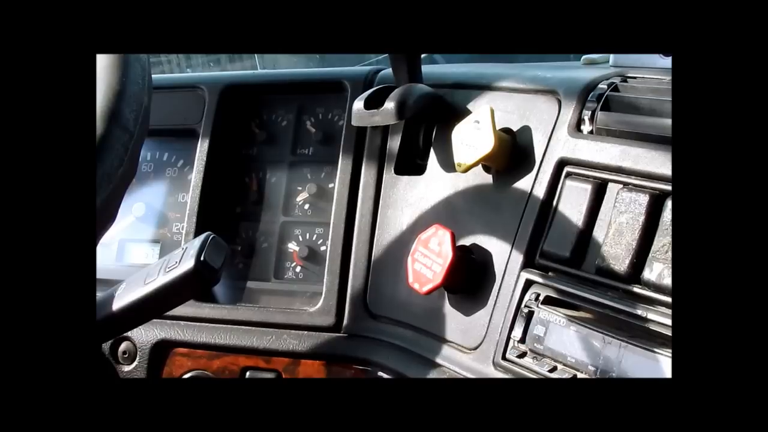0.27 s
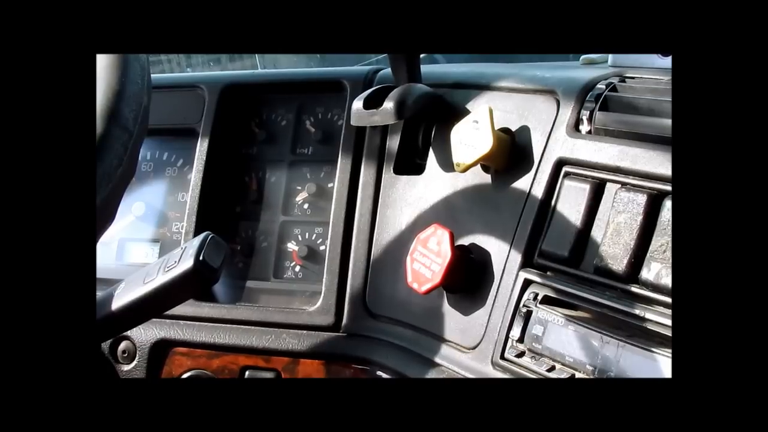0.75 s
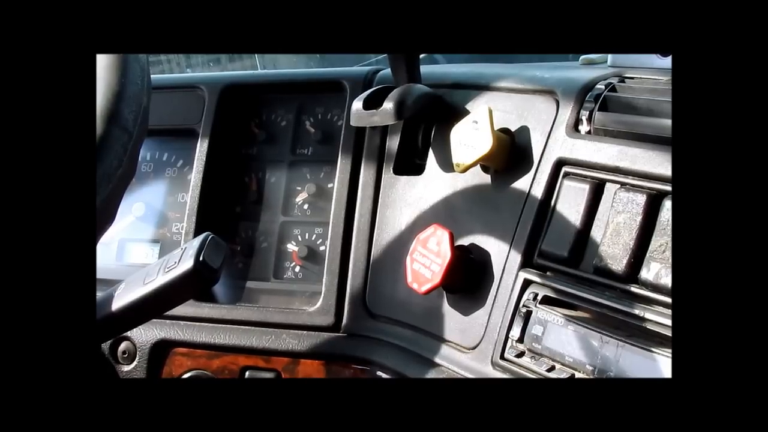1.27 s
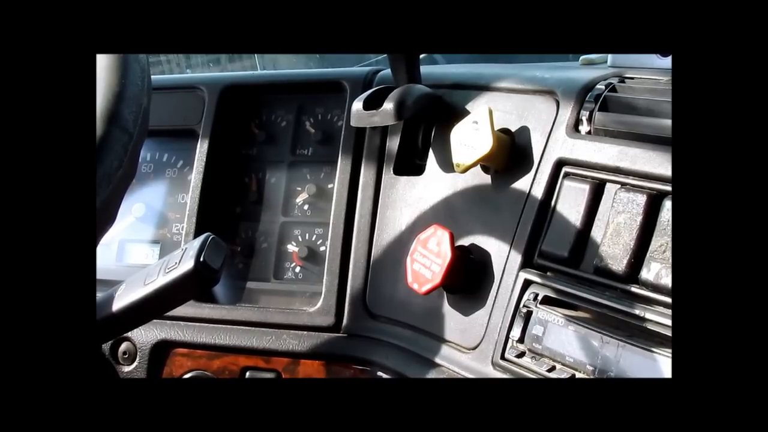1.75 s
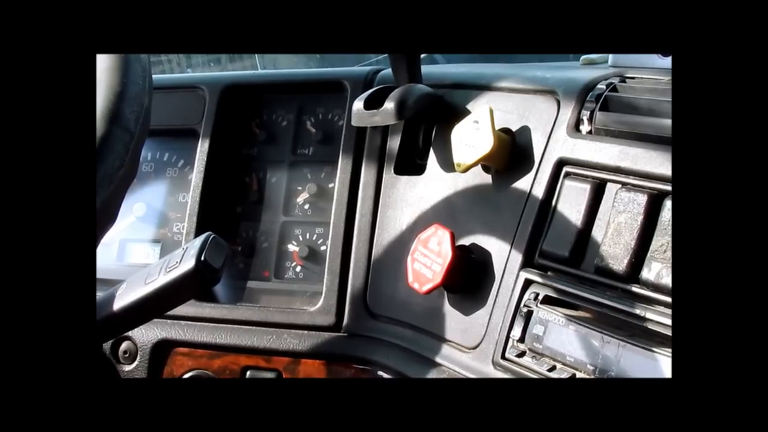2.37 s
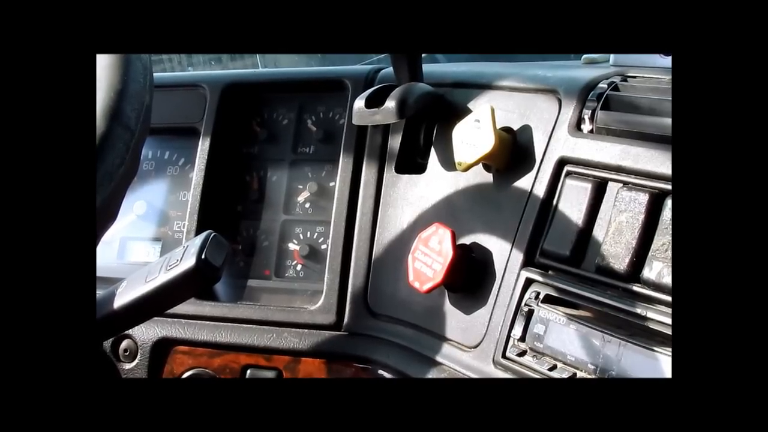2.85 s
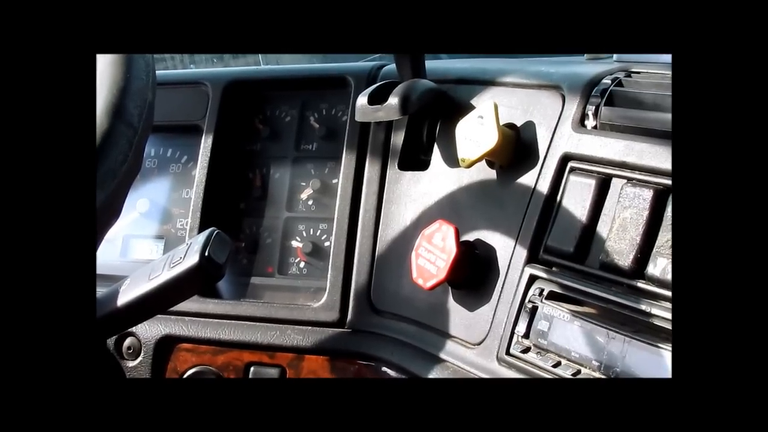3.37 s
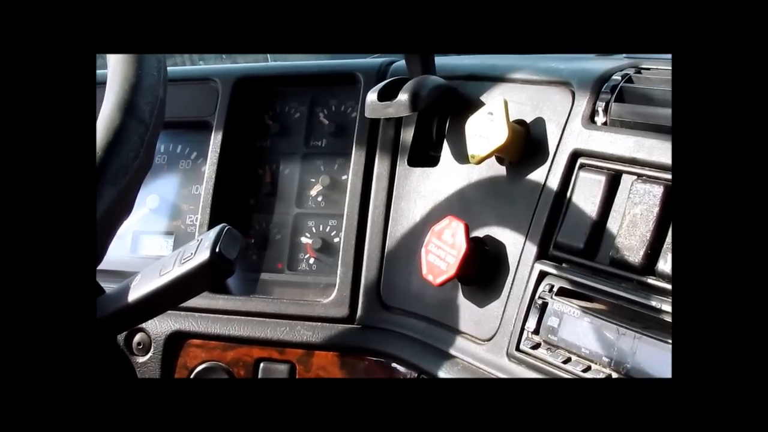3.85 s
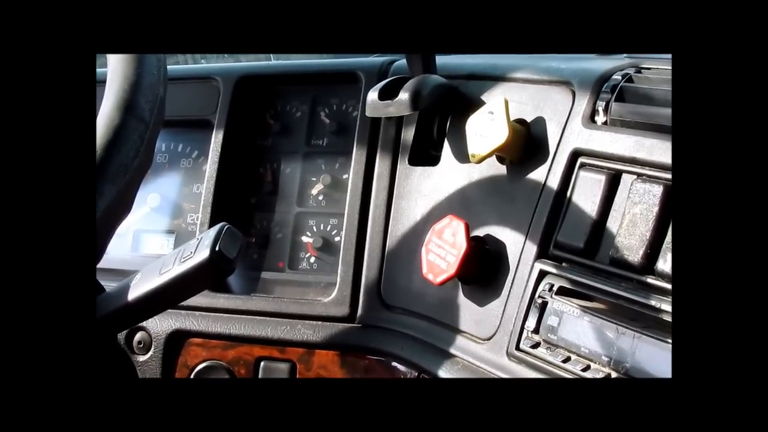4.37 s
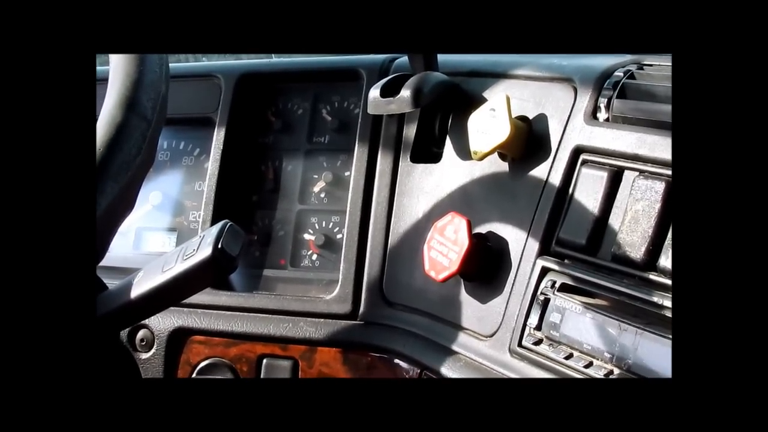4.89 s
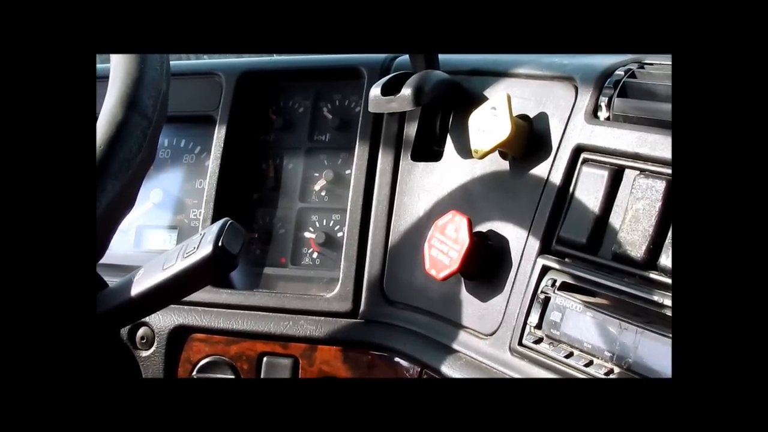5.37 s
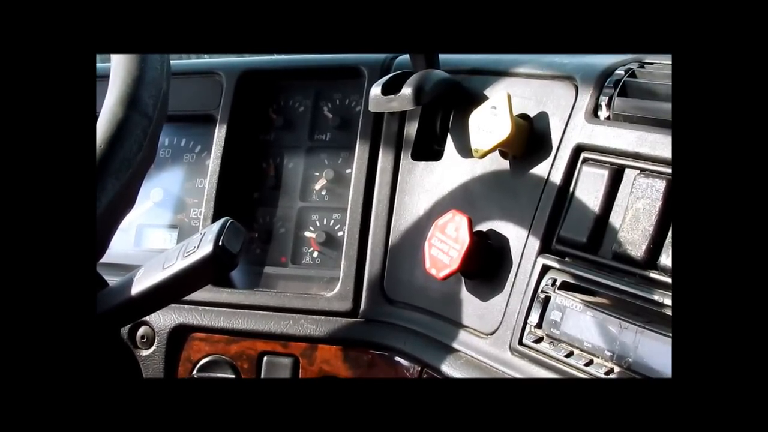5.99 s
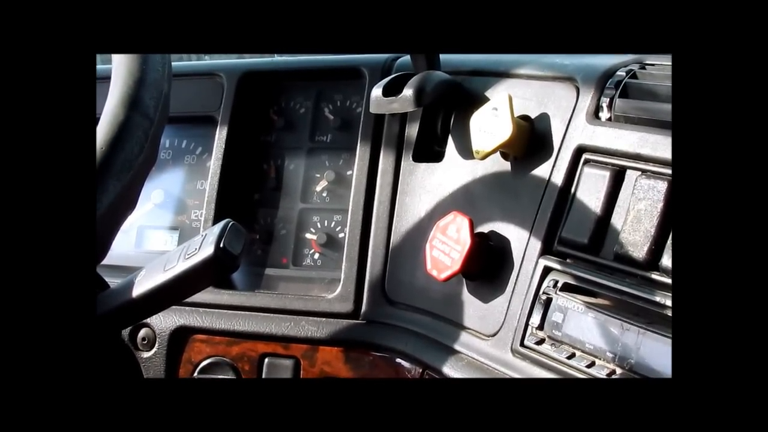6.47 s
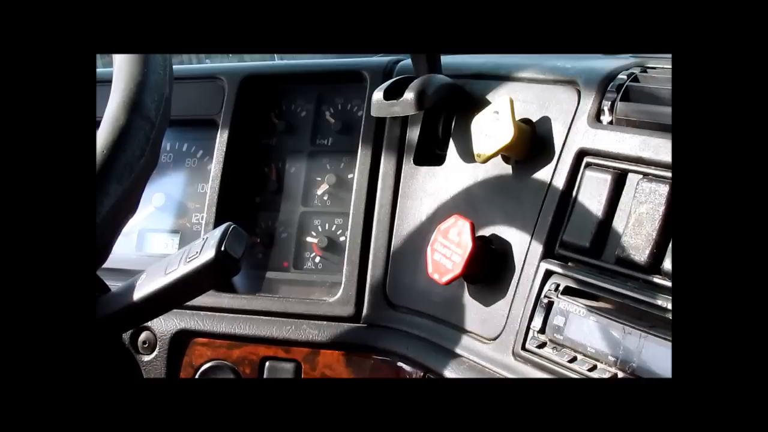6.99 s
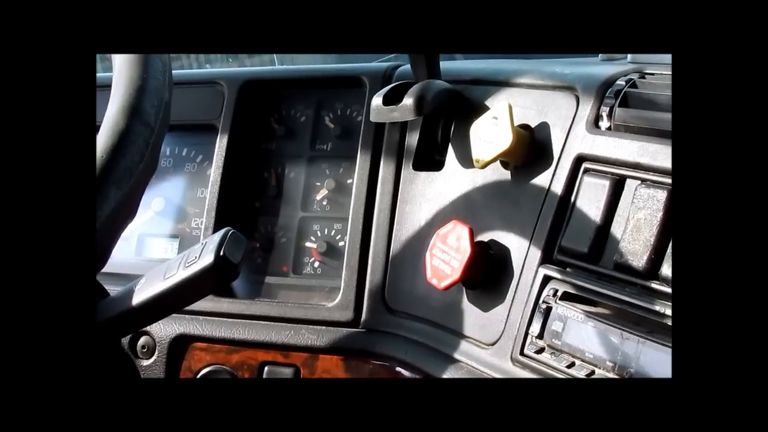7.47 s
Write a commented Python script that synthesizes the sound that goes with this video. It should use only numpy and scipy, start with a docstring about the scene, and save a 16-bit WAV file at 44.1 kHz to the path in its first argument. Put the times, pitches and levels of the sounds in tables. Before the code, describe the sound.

A bright, rushing air leak fills a parked truck's cab, faintly whistling and gradually fading over distant engine drone, with one soft bump partway through.

```python
"""Compressed air vents from an open brake line of a parked truck, heard from the driver's seat on a handheld camera.
From the start, shaped noise makes the jet rush through the cab's resonances, and gliding sines make it whistle.
As the tank empties the jet weakens and the whistle sinks in pitch; standing waves move it from side to side.
Behind it, wavering low sines make far engines drone and swell over a noise rumble.
Near 4.85 s something bumps softly: four close contacts, made of short dying sines, and a puff of rustling noise."""
import sys
import numpy as np
from scipy import signal
from scipy.fft import rfft, irfft, next_fast_len
from scipy.io import wavfile
from scipy.ndimage import uniform_filter1d, map_coordinates

SR = 44100
rng = np.random.default_rng(int(sys.argv[2]) if len(sys.argv) > 2 else 0)


def wav_record(signal):
    """Record a signal, one row per channel, as 16-bit PCM in the file named by sys.argv[1]."""
    frames = np.transpose(np.atleast_2d(signal))
    bounded = np.clip(frames, -1, 1)
    # unit amplitude maps onto the largest positive 16-bit level
    quanta = np.round(bounded * 32767).astype(np.int16)
    wavfile.write(sys.argv[1], SR, quanta)


N = 341334  # length in samples, about 7.74 s


def amp(db):
    """Turn decibels into a gain."""
    return 10 ** (np.asarray(db) / 20)


def unit(x):
    """Scale a sound to an average strength (rms) of 1."""
    return x / np.sqrt(np.mean(x ** 2) + 1e-20)


def along(points, hz, column=1):
    """Read a column of (frequency, value, ..) points at any frequency, on a log axis."""
    rows = np.transpose(points)
    return np.interp(np.log(hz + 1), np.log(rows[0] + 1), rows[column])


def curves(rows):
    """Join the points of each column after the time into a curve with one value per sample."""
    times, *columns = np.transpose(rows)
    t = np.arange(N) / SR
    return np.array([np.interp(t, times, column) for column in columns])


def wobble(rate):
    """Draw a smooth random curve through `rate` random points a second."""
    knots = rng.standard_normal(int(N * rate / SR) + 4)
    return map_coordinates(knots, [np.arange(N) * rate / SR])


def filtered(x, response):
    """Change the strength and timing of each frequency in x by a response (a function of Hz)."""
    size = next_fast_len(N + SR // 2)  # spare room so the end does not wrap onto the start
    spectrum = rfft(x, size) * response(np.fft.rfftfreq(size, 1 / SR))
    return irfft(spectrum, size)[..., :N]


def rush(patchy_db):
    """Stereo white noise with patches of random gain, as alike and as staggered as the two ports hear it."""
    # likeness of the two ports: f/Hz, left-right likeness (-1 to 1), scatter of the left lead/rad
    likeness = [(60, 0.91, 0.29), (300, 0.91, 0), (900, 0.95, 0.49), (1200, 0.83, 0.57), (1590, 0.59, 0.8),
                (2500, 0.64, 0.98), (4000, 0.48, 0.49), (6000, 0.7, 0.74), (7360, 0.97, 1),
                (10000, 0.41, 0.48), (12000, .55, 0.36), (14700, 0.46, .4)]
    # how far the left port runs ahead: f/Hz, left lead/rad
    left_lead = [(60, 0.77), (1700, 0), (2200, 0.1), (2700, 2.5), (3100, 1.04), (3700, 0.2), (4300, 1),
                 (6000, 0.7), (7200, -0.5), (8000, -1.5), (9000, -2.5), (11000, -1.87), (14500, -0.8)]
    spectra = signal.stft(rng.standard_normal((2, N)), nperseg=512)[2]
    patches = rng.standard_normal(spectra.shape[1:])
    patches = uniform_filter1d(patches, size=6, axis=0)  # smooth over frequency
    patches = uniform_filter1d(patches, size=14, axis=1)  # smooth over time
    pair = signal.istft(spectra * amp(patchy_db * unit(patches)), nperseg=512)[1][:, :N]

    def shares(hz):
        """Split of shared and opposite sound that gives the wanted likeness."""
        turn = np.arccos(np.clip(along(likeness, hz), -1, 1)) / 2
        return np.array([np.cos(turn), np.sin(turn)])

    mid, side = filtered(pair, shares)
    knots = rng.standard_normal(1000)  # reflections shift the lead from one narrow band to the next

    def stagger(hz):
        """Half of the lead goes to each port, with opposite signs."""
        scatter = along(likeness, hz, 2) * map_coordinates(knots, [hz / 90])
        return np.exp(1j * np.outer([.5, -.5], along(left_lead, hz) + scatter))

    return filtered(np.array([mid + side, mid - side]), stagger)


def tinted(x, spectrum):
    """Give stereo x a colour and the ports' left-right balance, then scale it to rms 1."""
    # balance of the ports: f/Hz, left minus right level/dB
    balance = [(60, 1.5), (130, -1), (290, -0.5), (630, 2.5), (1390, -3.0), (3050, 1), (6690, -5.5),
               (14700, -1)]
    return unit(filtered(x, lambda hz: amp(along(spectrum, hz) + np.outer([.5, -.5], along(balance, hz)))))


def cab(modes, hz, between_db):
    """Gain of broad-band sound: resonance peaks add in power over an even base."""
    peaks = sum(amp(2 * db) / (1 + (2 * (hz - centre) / width) ** 2) ** 2 for centre, width, db in modes)
    return np.sqrt(peaks + amp(2 * between_db))


def ripples(depth_db, width_hz):
    """Many small reflections comb the sound with fixed narrow peaks, unlike at each port."""
    knots = rng.standard_normal((2, 4000))
    return lambda hz: amp(depth_db * np.array([map_coordinates(k, [hz / width_hz]) for k in knots]))


def yard():
    """Outdoor noise rumble and the wavering firing note of a far engine, a low sine."""
    # far engine: t/s, f/Hz, level/dB
    engine = [(0.0, 69, -47), (0.45, 64.5, -40), (1.0, 66.5, -44.5), (1.65, 67.5, -39.5), (1.95, 67, -49),
              (2.16, 65.5, -36), (2.35, 62, -61), (2.95, 59.5, -41), (3.25, 58.5, -59), (3.6, 60, -48.5),
              (4.5, 62, -49), (5.9, 62.5, -49.5), (6.6, 64.5, -39.5), (7.05, 65.5, -43), (7.35, 67, -37.5),
              (7.74, 68.3, -38)]
    # colour of the rumble: f/Hz, level per Hz/dB
    rumble_colour = [(12, -44), (20, -4), (64, 0), (119, -5.5), (175, -5.5), (309, -10.5), (343, -16),
                     (386, -13.5), (497, -12.5), (700, -17.5), (910, -22), (1540, -120)]
    blur_db, rumble_db = -51.5, -42.5
    hz, db = curves(engine)
    phase = 2 * np.pi * np.cumsum(hz + .8 * wobble(9)) / SR
    note = np.sqrt(2) * amp(db + 1.6 * wobble(10)) * np.sin(phase)
    # narrow noise about the note breaks it up where it is weak
    blur = wobble(14) * np.sin(phase) + wobble(12) * np.cos(phase)
    rumble = tinted(rush(patchy_db=1.0), rumble_colour)
    return note + amp(blur_db) * blur + amp(rumble_db) * rumble


def traffic():
    """Far engine notes, each a sine that swells, glides a little and fades."""
    # passing notes: start t/s, end t/s, start f/Hz, end f/Hz, level/dB
    passes = [(.45, 1.499, 158, 163.3, -52), (.5, 1.5, 84, 82, -58), (1.1, 1.75, 115.6, 107.6, -50),
              (2.2, 3.602, 114, 108.3, -53), (3.5, 5.501, 88, 94.8, -58),
              (4.65, 5.806, 151.3, 158.5, -52.5), (6.5, 6.9, 192.3, 191, -54), (7.35, 7.74, 126, 131, -50)]
    out = np.zeros(N)
    for start, end, from_hz, to_hz, db in passes:
        a, b = round(start * SR), min(round(end * SR), N)
        hz = np.linspace(from_hz, to_hz, b - a) + 0.89 * wobble(8)[a:b]
        note = np.sqrt(2) * np.sin(2 * np.pi * np.cumsum(hz) / SR)
        out[a:b] += amp(db) * signal.windows.tukey(b - a, .4) * note
    return out


def bump():
    """Soft contacts on a hollow panel ring its low modes as dying sines, with a short noise rustle."""
    # contacts: t/s, level/dB
    contacts = [(4.8495, -20.5), (4.857, -21.5), (4.872, -27), (4.882, -25)]
    # ringing modes of the panel: f/Hz, level/dB, time to fall by 60 dB/s
    panel = [(215, -8, .08), (265, -10, .05), (330, -2, .03), (398, 0, .07), (608, -3, .05),
             (775, -8, .045), (964, -12, .03)]
    # colour of the rustle: f/Hz, level per Hz/dB
    rustle_colour = [(2500, -120), (4000, -6), (6000, -5), (9000, -2), (13000, -5), (14500, -10),
                     (15200, -25)]
    rustle_db, rise_s, hold_s, fall_60db_s = -32, 0.0074, 0.065, .15
    out, t = np.zeros(N + SR), np.arange(SR // 4) / SR
    for start, db in contacts:
        ring = np.zeros(len(t))
        for hz, level, t60 in panel:
            # each contact strikes the modes a little differently
            ring += amp(level + rng.normal(0, 1.3) - 60 * t / t60) * np.sin(2 * np.pi * hz * t)
        soft_start = 1 - np.exp(-t / 0.0016)
        out[round(start * SR):][:len(t)] += amp(db) * ring * soft_start
    since = np.arange(N) / SR - contacts[0][0]  # seconds since the first contact
    fade_db = 60 * np.maximum(since - hold_s, 0) / fall_60db_s
    puff = np.clip(since / rise_s, 0, 1) * amp(rustle_db - fade_db)
    rustle = tinted(rush(patchy_db=1.5), rustle_colour)
    return out[:N] + puff * amp(2.5 * wobble(250)) * rustle


def hoot():
    """A breathy note below the whistle: noise in one narrow resonance."""
    # strength of the breathy note: t/s, level/dB
    breath = [(0, -62), (3.5, -58), (5.3, -47), (5.7, -45), (7.74, -48)]
    resonance = [(6320, 73, 0)]  # f/Hz, width/Hz, level/dB
    note = unit(filtered(rush(patchy_db=0.0), lambda hz: cab(resonance, hz, between_db=-120)))
    return amp(curves(breath)[0]) * note


def whistle():
    """An edge tone at the coupling: a nearly steady sine in a haze of narrow noise, and its octave."""
    # whistle at the two ports: t/s, left level/dB, right level/dB, left lead/rad
    tone_path = [(0.0, -48, -29, 2.3), (0.2, -33, -32, 4.8), (0.45, -28.5, -25, 5.9), (0.8, -36, -22, 3.7),
                 (1.0, -34, -35, 5), (1.16, -28.5, -28.5, 6.3), (1.4, -32, -24, 4.3),
                 (1.75, -29, -27.5, 3.75), (2.35, -40, -33, 3.9), (2.65, -27.5, -35, 4.1),
                 (3.0, -30, -31, 5.3), (3.35, -25, -27, 5.6), (3.9, -23, -24.5, 6.2),
                 (4.2, -26.8, -27.5, 5.5), (4.9, -26, -28.7, 5.4), (5.1, -25.5, -34, 5.6),
                 (5.42, -26.5, -35, 5.6), (5.6, -30, -46, 5.2), (6.3, -30, -40, 6.2),
                 (6.75, -32.5, -32, 8.9), (7.05, -31.5, -33.5, 8.7), (7.42, -41, -47, 9.5),
                 (7.63, -36, -37, 9.5), (7.74, -42, -45, 10.7)]
    # its overtone, an octave up: t/s, left level/dB, right level/dB, left lead/rad
    octave_path = [(0.0, -48, -37, -2), (0.75, -42, -47, 1), (1.2, -42, -42, -1), (1.65, -55, -47, 4),
                   (2.3, -60, -54, 3.2), (2.9, -55, -57, 4.8), (3.5, -44, -43, 3.9), (4.2, -45, -39, 2.8),
                   (4.7, -41, -39, 4.5), (5.4, -46, -42, 1.5), (6.4, -50, -44, 1.5), (7.0, -53, -44, 2),
                   (7.45, -61, -60, 1.3), (7.74, -58, -56, 1.2)]
    # turbulent part of the whistle: t/s, level/dB
    haze_path = [(0, -34.5), (2, -41), (3, -39), (4, -47), (6.3, -40), (6.8, -38), (7.3, -38.5),
                 (7.74, -56)]
    start_hz, sink_hz, settle_s = 7063.8, 140.9, 4.45  # the sinking slows over a few settle times
    left_db, right_db, lead = curves(tone_path)
    pitch_hz = start_hz - sink_hz * np.tanh(np.arange(N) / SR / settle_s)
    drift_hz = 1.5 * wobble(10) + 3 * wobble(50)
    phase = 2 * np.pi * np.cumsum(pitch_hz + drift_hz) / SR
    shimmer_db = .7 * np.array([wobble(14), wobble(14)]) + .9 * wobble(30)
    tone = amp([left_db, right_db] + shimmer_db) * np.sin(phase + np.outer([.5, -.5], lead))
    # the haze beats against the tone, which breaks up wherever it is weak
    haze = np.array([wobble(65) * np.sin(phase) + wobble(65) * np.cos(phase) for _ in range(2)])
    *octave_db, octave_lead = curves(octave_path)
    flicker_db = 1.8 * np.array([wobble(15), wobble(15)])
    octave = amp(octave_db + flicker_db) * np.sin(2 * phase + np.outer([.5, -.5], octave_lead))
    return np.sqrt(2) * (tone + octave) + amp(curves(haze_path)[0]) * haze


def jet():
    """Turbulent noise roar ringing the cab, with finer fizz and hiss above it; all sag as the pressure drops."""
    # cab resonances at the left and right port: f/Hz, width/Hz, level/dB
    cab_left = [(399, 35, -14), (758, 17, -2.5), (868, 18, -7), (1094, 41, 0.5), (1157, 9.2, -15),
                (1356, 24, -3.5), (1519, 22, -0.5), (1645, 33, -4.5), (1818, 20, 2), (1885, 42, -4),
                (2140, 34, -15), (2105, 43, -3), (2363, 32, 0.5), (2456, 8.9, 5.5), (2710, 75, -11.5),
                (2873, 36, -1), (2930, 26, -5), (3030, 120, -9.5), (3560, 54, -15), (3440, 12, -6.5),
                (3750, 24, -6), (4004, 65, -2)]
    cab_right = [(388, 36, -9), (760, 47, -5), (884, 22, -8.5), (1092.5, 35, -0.5), (1180, 7.8, -1.5),
                 (1350, 78, -10.5), (1512, 24, 0), (1683, 33, 2.5), (1940, 23, 1.5), (2096, 130, 3.5),
                 (2233, 8.2, 1.5), (2294, 7.7, 7), (2360, 86, -8.5), (2487, 30, 1.5), (2580, 34, 3),
                 (2710, 130, -1.5), (2946, 34, -7.5), (3020, 25, -2.5), (3150, 71, -3.5), (3610, 42, -7),
                 (3870, 31, -3), (4285, 62, -3)]
    # treble resonances at the left and right port: f/Hz, width/Hz, level/dB
    treble_left = [(4823, 138, 4), (5039, 59, 2), (5642, 78, 2), (6051, 81, 3), (6266, 37, 3),
                   (8506, 24, 2), (8893, 342, 4), (9496, 42, 3), (10487, 60, 2), (11391, 99, 4),
                   (11649, 99, 5), (12037, 63, 1), (12834, 45, 2), (13200, 92, 3)]
    treble_right = [(5233, 34, 2), (5685, 57, 2), (5986, 103, 5), (6374, 91, 2), (8506, 33, 3),
                    (8721, 84, 4), (8915, 48, 2), (9044, 44, 4), (11262, 41, 5), (11843, 338, 5),
                    (12037, 47, 2), (12339, 50, 3), (12920, 37, 3), (13264, 61, 2)]
    # colours of the three layers, low to high: f/Hz, level per Hz/dB
    roar_colour = [(200, -120), (330, -9), (700, -8.5), (1000, -0.5), (2000, -1), (3000, 1), (4300, -7.5),
                   (5000, -42), (6000, -120)]
    fizz_colour = [(2800, -120), (3600, -33), (4500, -2), (5300, -4.5), (6200, -3), (6800, -2),
                   (7700, -6.5), (8600, -15), (10000, -60), (11000, -120)]
    hiss_colour = [(5000, -120), (6000, -30), (7200, -15.5), (8000, -2), (8900, 2), (10200, -3),
                   (11000, -3), (11600, 0.5), (12500, -3.5), (14000, -6), (14500, -20), (15200, -39)]
    # rows for roar, fizz and hiss: start level/dB, steady sag/(dB per s), extra level at the start/dB
    layers = [(-25, 0.46, 0), (-33.5, 0.65, 0.6), (-31, 0.69, 3.5)]
    t = np.arange(N) / SR
    early = np.exp(-t / 0.79)  # the extra level fades to about a third every 0.79 s
    roar_db, fizz_db, hiss_db = [start - sag * t + extra * early for start, sag, extra in layers]

    def ring(hz):
        """The cab's resonances at both ports."""
        return np.array([cab(cab_left, hz, between_db=-14.0), cab(cab_right, hz, between_db=-10)])

    def treble(hz):
        """The treble resonances at both ports."""
        return np.array([cab(treble_left, hz, between_db=2), cab(treble_right, hz, between_db=1.5)])

    comb = ripples(depth_db=1.3, width_hz=11)
    roar = unit(filtered(rush(patchy_db=.5), lambda hz: comb(hz) * ring(hz) * amp(along(roar_colour, hz))))
    fizz = tinted(filtered(rush(patchy_db=0.87), lambda hz: comb(hz) * treble(hz)), fizz_colour)
    hiss = tinted(filtered(rush(patchy_db=1.43), lambda hz: comb(hz) * treble(hz)), hiss_colour)
    flutter_db = .3 * wobble(6) + .3 * wobble(15)
    return amp(roar_db) * roar + amp(fizz_db) * fizz + amp(hiss_db + flutter_db) * hiss


def scene():
    """Add up all sources at the camera's two sound openings, the left and right port."""
    return yard() + traffic() + bump() + hoot() + whistle() + jet()


def record(dry):
    """The camera keeps nothing above its band limit."""
    top_hz = 15200
    return filtered(dry, lambda hz: hz < top_hz)


dry = scene()
out = record(dry)
wav_record(out)
```